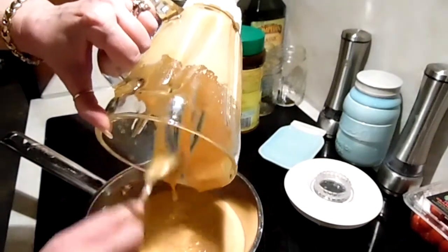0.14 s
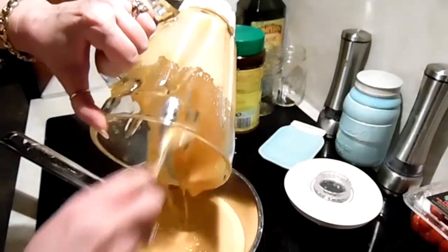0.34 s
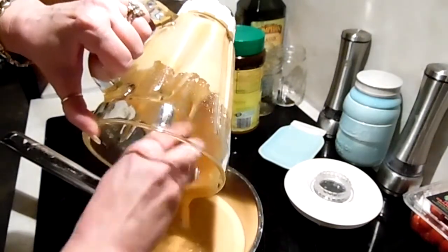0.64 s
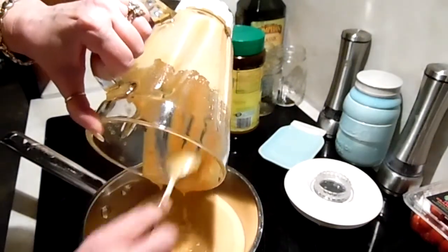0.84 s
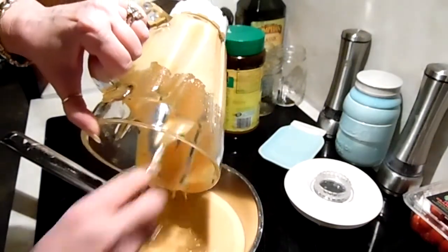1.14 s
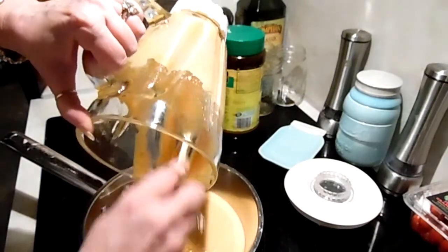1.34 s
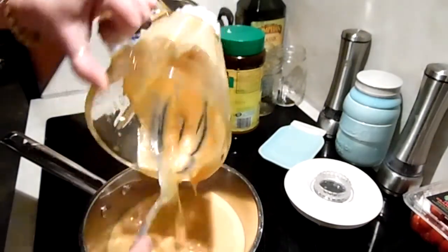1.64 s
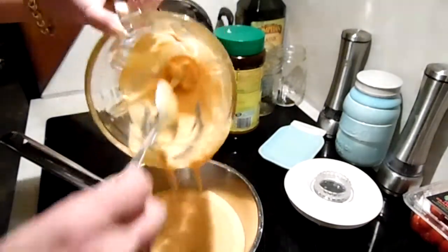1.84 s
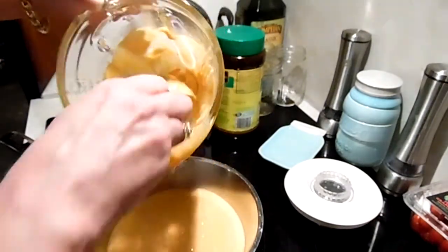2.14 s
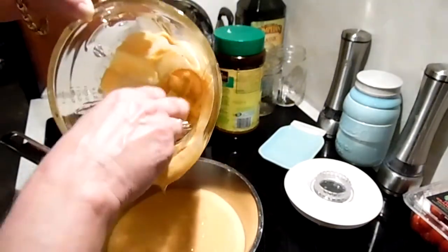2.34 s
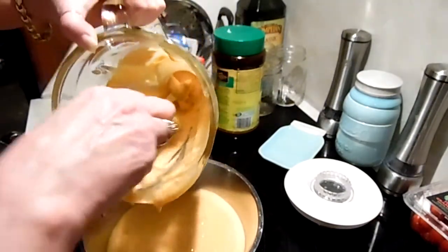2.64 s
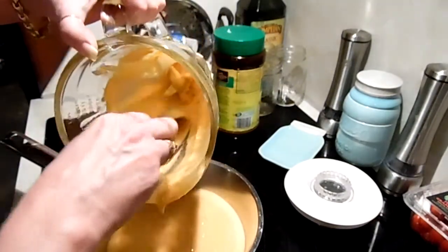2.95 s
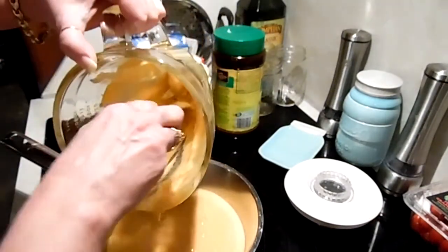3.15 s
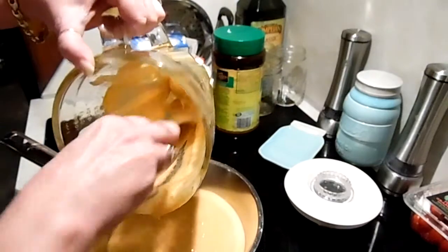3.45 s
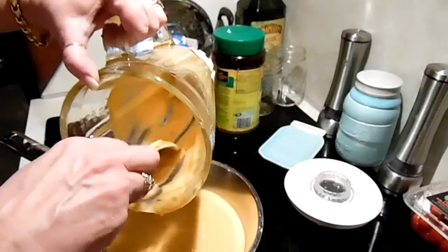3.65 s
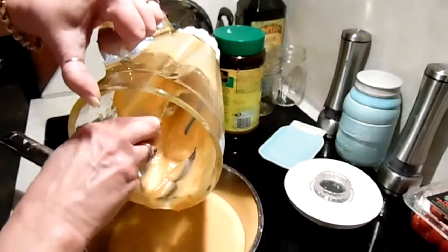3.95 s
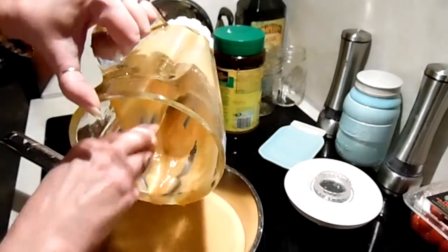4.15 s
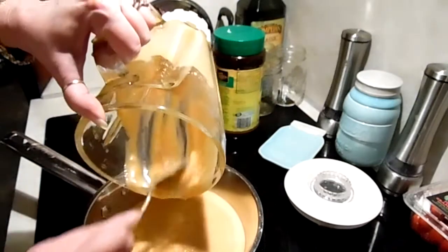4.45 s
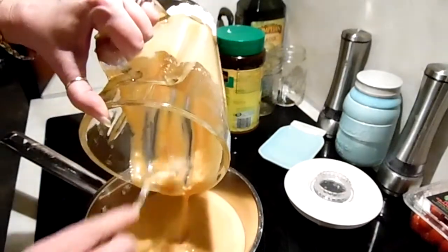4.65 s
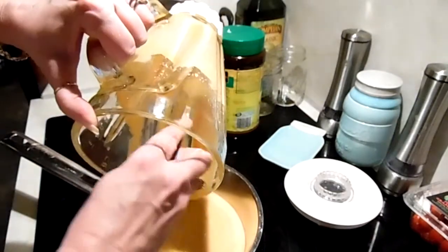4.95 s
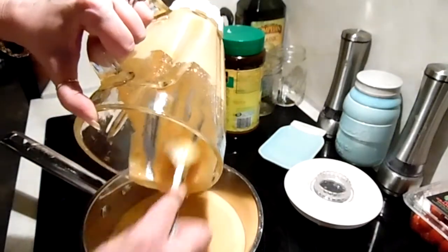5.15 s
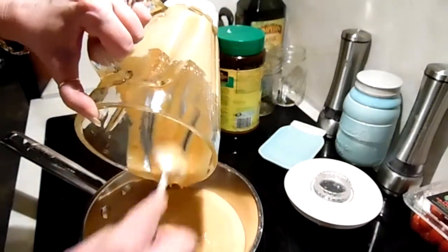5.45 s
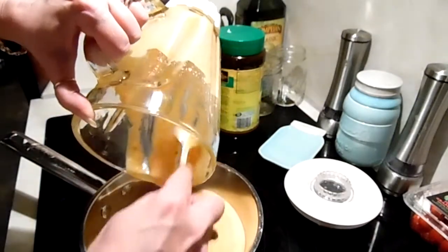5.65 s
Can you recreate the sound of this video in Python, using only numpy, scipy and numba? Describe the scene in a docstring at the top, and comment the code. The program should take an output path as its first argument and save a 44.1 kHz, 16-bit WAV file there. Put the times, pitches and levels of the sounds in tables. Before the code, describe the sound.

A scrape opens, then a spoon knocks a glass jar in uneven sharp clinks, each dying almost at once. A pause near two seconds gives way to quieter taps and a squeaky drag, then harder strikes on the rim. Tiny metallic jewellery rings are barely audible. Close microphone, mono, small kitchen with short reflections and faint hiss.

```python
"""In a quiet kitchen, a metal spoon scrapes thick batter out of a tilted glass jar.
Each tap is a set of short dying tones (jar and spoon ringing) plus a noisy crack, coloured by where it lands.
Between taps, dense random clicks through ringing filters make the spoon drag along the wall.
Tiny high rings make a faint bracelet jingle. An echo of filtered noise surrounds all of these.
Shaped noise adds low room rumble and microphone hiss."""
import sys
import numpy as np
from scipy import signal
from scipy.fft import rfft, irfft
from scipy.io import wavfile
from scipy.ndimage import uniform_filter1d
from numba import njit

SR = 44100
rng = np.random.default_rng(int(sys.argv[2]) if len(sys.argv) > 2 else 0)


def master_out(mix):
    """Clip the mix to full scale and print it as 16-bit PCM to the path in sys.argv[1]."""
    frames = np.transpose(np.atleast_2d(mix))
    ceiling = np.clip(frames, -1, 1)
    pcm = np.round(ceiling * 32767).astype(np.int16)
    wavfile.write(sys.argv[1], SR, pcm)


N = 255780   # length of the scene [samples]

# pitches at which the jar and spoon ring: [Hz]
RING_HZ = [230, 400, 495, 1044, 1127, 1300, 1875, 2089, 2197, 2350, 2678, 3010, 3273, 3390, 3570, 3830,
           4231, 4940, 5070, 5160, 5310, 5770, 6096, 6430, 7000, 7680, 8030, 8220, 8590, 9400, 10750]
# how each of those pitches rings: (level [dB], time to fall by 60 dB [s])
RING_LEVEL_AND_T60 = [(-8.5, 0.037), (1, 0.022), (2.5, 0.045), (-1.5, 0.091), (0, 0.19), (-3, 0.043),
                      (-4.5, 0.055), (-4.5, 0.025), (-10, 0.051), (-11, 0.1), (1.5, 0.095), (-20, 0.039),
                      (-5, 0.098), (-3, 0.051), (-16.5, 0.027), (-2.5, 0.028), (-16.5, 0.047), (8, 0.031),
                      (-11, 0.027), (-7, 0.095), (-9, 0.047), (-15.5, 0.02), (-4, 0.038), (-4, 0.045),
                      (-7, 0.038), (-3.5, 0.04), (-12.5, 0.017), (-5, 0.033), (-4.5, 0.017), (-13.5, 0.026),
                      (-12, 0.035)]
# colour of the noise in cracks and grit: (frequency [Hz], level [dB per Hz])
CRACK_COLOUR = [(500, -50), (1000, -32), (1600, -6.5), (2000, -7.5), (3400, -4.5), (4400, -4.5),
                (5000, 0.5), (6000, -7), (10800, -14.5), (16000, -31.5)]


def from_db(db):
    """Turn decibels into a plain multiplier."""
    return 10 ** (np.asarray(db) / 20)


def rms_one(x):
    """Scale a sound so that its average (RMS) strength is 1."""
    return x / np.sqrt(np.mean(x ** 2) + 1e-20)


def at_hz(points, hz):
    """Read a (frequency [Hz], value) table, with frequency spaced as the ear hears it (log)."""
    table_hz, values = np.transpose(points)
    return np.interp(np.log(hz), np.log(table_hz), values)


def coloured(x, spectrum):
    """Make each frequency of x louder or softer, following (frequency [Hz], level [dB]) points."""
    hz = np.maximum(np.fft.rfftfreq(len(x), 1 / SR), 1)
    return irfft(rfft(x) * from_db(at_hz(spectrum, hz)), len(x))


def band(x, low_hz, high_hz):
    """Keep mainly the frequencies between two limits (Butterworth band-pass)."""
    edges_hz = [low_hz, min(high_hz, .45 * SR)]
    return signal.sosfilt(signal.butter(2, edges_hz, "band", fs=SR, output="sos"), x)


def ring(force, hz, t60):
    """A struck object: each unit click sets off a sine of height 1 that falls by 60 dB in t60 seconds."""
    shrink = from_db(-60 / (t60 * SR))   # per sample
    turn = 2 * np.pi * hz / SR           # radians per sample
    feedback = [1, -2 * shrink * np.cos(turn), shrink * shrink]
    return signal.lfilter([0, np.sin(turn)], feedback, force + 1e-18)


def strike_colour(place, bell_db, middle_db, treble_db):
    """Where the spoon lands decides which pitches it excites: a blend of wall and rim, then extras."""
    # strike colour at the two ends of the jar: (frequency [Hz], on the wall [dB], at the rim [dB])
    wall_and_rim = [(500, -38, -47), (1300, -27.5, -33), (1710, -23.5, -38), (1922, -15, -30),
                    (2200, -12, -29.5), (3468, -15, -26.5), (3262, -13.5, -25.5), (3370, -24.5, -17),
                    (3750, -14.5, -23), (4450, -27.5, -25), (5000, -29, -19.5), (6300, -16.5, -24),
                    (7905, -23.5, -14), (8590, -17, -19.5)]
    # tones set separately for each tap: [Hz]
    bell_hz = [1044, 1128, 2680]
    # the middle range: (from [Hz], to [Hz])
    middle_hz = (3000, 4000)
    treble_from_hz = 5400
    hz, wall_db, rim_db = np.transpose(wall_and_rim)
    db = wall_db + place * (rim_db - wall_db)
    in_middle = (hz > middle_hz[0]) & (hz < middle_hz[1])
    db = db + middle_db * in_middle
    # the treble change grows from nothing to its full amount at the table's last frequency
    treble_share = np.clip(np.log(hz / treble_from_hz) / np.log(hz[-1] / treble_from_hz), 0, 1)
    db = db + treble_db * treble_share
    return sorted([*zip(hz, db), *zip(bell_hz, bell_db)])


def taps(ring_db, crack_db, crack_t60, spread_db, detune):
    """Each tap swells in during contact, sets the jar and spoon ringing and leaves a short noisy crack."""
    # every tap: (time [s], level before ring and crack gains [dB], place [0 deep on the wall, 1 at the rim],
    #             three bell tones [dB each], extra middle [dB], extra treble [dB], contact time [ms])
    tap_list = [(0.171, -23.5, 0.57, -27, -34, -51, 1.5, -15, 1.6),
                (0.212, -27, 0.37, -22, -16.5, -19, 0, -3.5, 0.51),
                (0.5318, -14, 0.69, -54.5, -31, -30.5, 8.5, 5, 0.62),
                (0.596, -6, 0.13, -32, -40.5, -24.5, -1.5, 1.5, 1.4),
                (0.9036, -15, 0.59, -28, -37, -31, -5.5, -7, 0.65),
                (0.9484, -28.5, 0.49, -16, -23.5, -18.5, -2, -8, 0.8),
                (1.2631, -5.5, 1.03, -39.5, -30.5, -28.5, 2, -0.5, 0.67),
                (1.3739, -11.5, 0.63, -37, -41.5, -25.5, -7, 1.5, 1.0),
                (1.498, -5.5, 0.99, -27, -44.5, -20.5, -1.5, 0, 1.12),
                (2.2499, -25.5, 0.36, -34, -16.5, -30, 0.5, 5, 0.67),
                (2.3244, -10.5, 0.069, -53.5, -39, -23.5, 6.5, 0, 0.32),
                (2.3651, -30.5, -0.091, -33, -33, -32, -19.5, 9, 1.0),
                (2.485, -15.5, -0.099, -28, -34.5, -37, -0.5, -3.5, 0.41),
                (2.818, -36, -0.12, -37, -33, -27, 3.5, -16, 0.5),
                (2.8375, -16, 0.29, -39.5, -42, -28.5, 2, 4, 0.61),
                (2.874, -19, 0.23, -58.5, -38, -32, 2, -10.5, 0.48),
                (2.9066, -23, -0.03, -29, -37, -27.5, -1.5, 1, 0.77),
                (3.195, -12, 0.096, -36.5, -40.5, -36, 2, -3.5, 0.23),
                (3.214, -34.5, -0.08, -25, -20, -21, 18, -6, 2.6),
                (3.275, -28.5, -0.18, -54, -50, -20, -1.5, 4, 0.51),
                (3.4301, -28.5, -0.35, -42.5, -36, -26, 2, -9, 2.0),
                (3.969, -25, 0.2, -22, -20.5, -28, 3.5, -0.5, 0.65),
                (4.0158, -10.5, 0.11, -35.5, -32.5, -23.5, 3.5, 1, 0.47),
                (4.403, -49.5, 0.95, -28, -24.5, -18, 12, -1, 2.5),
                (4.4899, -11, 0.77, -29.5, -41, -29, -3.5, -4.5, 0.8),
                (4.542, -17, 0.69, -22.5, -43, -19, 0.5, -4.5, 0.93),
                (4.9099, -4.5, 0.92, -47, -28, -36, 7.5, 1, 0.47),
                (5.0579, -13.5, 0.58, -34.5, -33, -24, 2, 5.5, 0.76),
                (5.0877, -25.5, 0.13, -21.5, -15, -24, 3, -4, 1),
                (5.245, -11.5, 0.77, -32, -47, -29, -2, 1.5, 1.5),
                (5.2781, -17, 0.85, -25.5, -56, -19, 2, -4.5, 3.4),
                (5.585, -9.5, 0.77, -28, -23, -25.5, -2, -2.5, 0.91),
                (5.678, -4.5, 1.02, -27.5, -31, -16.5, -5.5, -0.5, 1.2),
                (5.7914, -4, 1.05, -37.5, -26.5, -23.5, 1, 0.5, 4.3)]
    size = SR // 2
    out = np.zeros(N + size)
    t = np.arange(size) / SR
    hz = np.array(RING_HZ)[:, None]
    mode_db, t60 = np.transpose(RING_LEVEL_AND_T60)[:, :, None]
    decays = from_db(mode_db - 60 * t / t60)
    crack_decay = from_db(crack_db - 60 * t / crack_t60)
    # random level changes, growing with pitch up to 3000 Hz, so that taps differ
    uneven_db = spread_db * np.clip(hz / 3000, 0, 1) ** 2
    for time_s, tap_db, place, *bell_db, middle_db, treble_db, contact_ms in tap_list:
        colour = strike_colour(place, bell_db, middle_db, treble_db)
        random_db = uneven_db * rng.standard_normal(hz.shape)
        strength = from_db(ring_db + at_hz(colour, hz) + random_db)
        # grip and batter shift the pitches a little
        pitch = hz * (1 + detune * rng.standard_normal(hz.shape))
        start_phase = rng.random(hz.shape)
        tones = strength * decays * np.sin(2 * np.pi * (pitch * t + start_phase))
        noise = rms_one(coloured(rng.standard_normal(size), CRACK_COLOUR))
        crack = crack_decay * coloured(noise, colour)
        swell = 1 - np.exp(-t * 1000 / max(contact_ms, .2))
        at = round(time_s * SR)
        out[at:at + size] += from_db(tap_db) * swell * (tones.sum(axis=0) + crack)
    return out[:N]


@njit
def squeak(force, hz, width_hz, rate):
    """A resonance whose centre pitch moves as the contact point slides."""
    out = np.zeros(len(force))
    for i in range(2, len(force)):
        r = np.exp(-np.pi * width_hz[i] / rate)
        push = np.sqrt(1 - r) * (force[i] - force[i - 2])
        swing = 2 * r * np.cos(2 * np.pi * hz[i] / rate) * out[i - 1]
        out[i] = push + swing - r * r * out[i - 2]
    return out


def drags(per_s, damping):
    """The spoon sticks and slips: dense clicks excite ringing tones, a sliding squeak and broad grit."""
    # every drag: (hardest moment [s], pressing in [s], easing off [s], level lost by the end [dB],
    #              three rubbed groups [dB each], squeak [dB], grit [dB],
    #              squeak at start [Hz], squeak at end [Hz], width of each squeak filter [Hz])
    drag_list = [(.1, .15, 0.079, 2.5, -60, -54.5, -58.5, -51, -57.5, 2060, 2610, 381),
                 (0.174, .022, 0.031, 16, -63, -56, -43, -45, -50.5, 2700, 2670, 410),
                 (.68, .04, 0.27, 9.2, -71, -63, -66, -66, -63, 2930, 2080, 500),
                 (1.36, .03, 0.019, 2.3, -71, -73, -74.5, -70, -68, 1300, 1300, 192.8),
                 (2.447, .015, .012, 6.5, -71, -68.5, -60, -49.5, -66, 2200, 2250, 249),
                 (2.468, .008, 0.014, 3.3, -67, -69, -55.5, -63, -58, 2250, 2200, 298),
                 (3.435, .03, .03, 14, -69, -46, -53, -38, -51.5, 2200, 2277, 149.3),
                 (3.49, .03, .14, 7.3, -69.5, -58, -70.5, -63, -72.5, 2300, 2330, 130.6),
                 (3.65, .025, 0.044, 13, -67.5, -76.5, -91.5, -77, -93, 2000, 1464, 201),
                 (4.2, .06, 0.059, 3.9, -73, -72, -78, -78.5, -73, 2200, 2200, 201.5),
                 (4.3, .047, 0.037, 2.1, -74, -62, -61, -73.5, -69, 2200, 2200, 195),
                 (4.4, .027, 0.078, 23, -67, -65, -80, -69, -66, 2400, 2590, 194),
                 (4.769, .06, 0.064, 8, -84, -81, -82, -86.5, -70.5, 2700, 2600, 313),
                 (5.03, .04, 0.045, 3.5, -60, -68, -78, -75, -83, 2216, 2280, 295)]
    # groups of ringing pitches that sing under the spoon: (from [Hz], to [Hz])
    rubbed_groups = [(1000, 1250), (1750, 2000), (3100, 3700)]
    landing_db = -4.5   # level at the start of a drag, compared with its hardest moment
    t = np.arange(N) / SR
    gains = np.zeros((5, N))   # three rubbed groups, squeak, grit
    hz, width_hz = np.full(N, 2000.), np.full(N, 300.)   # squeak settings between drags
    for hardest, press_s, ease_s, lost_db, *voice_db, from_hz, to_hz, width in drag_list:
        start, end = hardest - press_s, hardest + ease_s
        inside = (t >= start) & (t <= end)
        hz[inside] = np.interp(t[inside], [start, end], [from_hz, to_hz])
        width_hz[inside] = width
        pressure_db = np.interp(t[inside], [start, hardest, end], [landing_db, 0, -lost_db])
        gains[:, inside] += from_db(np.add.outer(voice_db, pressure_db))
    slip_size = from_db(2.2 * rng.exponential(1, N))
    slips = (rng.random(N) < per_s / SR) * slip_size * rng.choice([-1, 1], N)
    voices = []
    for low_hz, high_hz in rubbed_groups:
        rubbing = band(slips, 0.85 * low_hz, 1.15 * high_hz)
        # the resting spoon shortens every ring
        voices.append(sum(ring(rubbing, mode_hz, t60 * damping)
                          for mode_hz, (_, t60) in zip(RING_HZ, RING_LEVEL_AND_T60)
                          if low_hz < mode_hz < high_hz))
    squeak_once = squeak(slips, hz, width_hz, float(SR))
    voices.append(squeak(squeak_once, hz, width_hz, float(SR)))
    voices.append(coloured(slips, CRACK_COLOUR))   # grit
    smooth_gains = uniform_filter1d(gains, size=SR // 150)
    return sum(gain * rms_one(voice) for gain, voice in zip(smooth_gains, voices))


def bracelet(level_db, per_s):
    """Each shake sets off a dying cluster of tiny link collisions, ringing high."""
    # every jingle: (time [s], level before level_db and smoothing [dB])
    jingle_list = [(0.391, -52), (1.0513, -50), (1.209, -50.5), (1.7094, -52), (1.8809, -54), (2.0447, -61),
                   (2.073, -51.5), (2.2107, -50), (2.715, -43.5), (3.0679, -44.5), (3.5515, -52.5),
                   (3.5926, -53), (3.6666, -52), (4.15, -50), (4.7292, -55)]
    low_hz, high_hz, cluster_t60_s, link_t60_s = 6240, 13000, 0.077, 0.0064
    shakes = np.zeros(N)
    for time_s, shake_db in jingle_list:
        shakes[round(time_s * SR)] = from_db(shake_db + level_db)
    dying = signal.lfilter([1], [1, -from_db(-60 / (cluster_t60_s * SR))], shakes)
    dying = uniform_filter1d(dying, size=SR // 80)   # the links start moving one after another
    links = (rng.random(N) < per_s / SR) * rng.standard_normal(N)
    pitches = np.geomspace(low_hz, high_hz, 16)
    dealt = rng.integers(0, 16, N)   # which pitch each collision rings
    rings = sum(ring(links * (dealt == k), hz, link_t60_s) for k, hz in enumerate(pitches))
    return dying * rms_one(rings)


def kitchen(x, build_up_s):
    """Diffuse echo: bands of noise, each dying at its own rate, stand for the many reflections."""
    # how long the echo takes to fall by 60 dB: (frequency [Hz], time [s])
    echo_t60 = [(1000, 0.39), (2000, 0.29), (6000, 0.22), (14000, 0.2)]
    t = np.arange(SR // 2) / SR
    edges = 800 * 2. ** np.arange(6)   # octave steps [Hz]
    tail = np.zeros(len(t))
    for low_hz, high_hz in zip(edges, edges[1:]):
        noise = band(rng.standard_normal(len(t)), low_hz, high_hz)
        tail += noise * from_db(-60 * t / at_hz(echo_t60, np.sqrt(low_hz * high_hz)))
    tail = tail * (1 - np.exp(-t / build_up_s))
    return signal.fftconvolve(x, tail / np.sqrt(np.sum(tail ** 2)))[:N]


def rumble():
    """Low room noise in two bands: the upper wanders in level, the deep one swells once."""
    # colour of the noise before it is split: (frequency [Hz], level [dB per Hz])
    rumble_colour = [(3.5, -32.5), (6.0, 3), (42, -0.5), (71, -15.5), (111, -10.5), (151, -23.5),
                     (200, -23), (260, -48.5), (440, -120)]
    # loudness of the upper band: (time [s], level [dB])
    upper_level = [(0.0, -58.5), (1.79, -59.5), (2.1, -61.5), (3.42, -61.5), (4.6, -57.5), (5.0, -60),
                   (5.8, -64)]
    base_db, swell_db, swell_at_s, swell_width_s = -69, 29, 4.73, 0.38   # deep band
    t = np.arange(N) / SR
    noise = coloured(rng.standard_normal(N), rumble_colour)
    deep, upper = band(noise, 6, 18), band(noise, 18, 150)
    deep_db = base_db + swell_db * np.exp(-((t - swell_at_s) / swell_width_s) ** 2)
    upper_db = np.interp(t, *np.transpose(upper_level))
    return from_db(deep_db) * rms_one(deep) + from_db(upper_db) * rms_one(upper)


def microphone_hiss(level_db):
    """Steady random noise from the microphone, shaped to its own colour."""
    # colour of the hiss: (frequency [Hz], level [dB per Hz])
    hiss_colour = [(88, -31.5), (150, -9), (201, -7), (434, -7.5), (814, -13), (1380, -17.5), (4160, -18),
                   (11100, -19), (15200, -23.5), (16500, -35.5)]
    return from_db(level_db) * rms_one(coloured(rng.standard_normal(N), hiss_colour))


def scene():
    """Add the close sounds of jar and bracelet, their echo and the background."""
    close = taps(ring_db=3.0, crack_db=13.0, crack_t60=0.047, spread_db=3.0, detune=0.0025)
    close = close + drags(per_s=9000, damping=.6)
    close = close + bracelet(level_db=-13.0, per_s=4500)
    echo = from_db(-12.5) * kitchen(close, build_up_s=0.0013)
    return (close + echo + microphone_hiss(level_db=-72.5) + rumble())[None]


def record(dry):
    """Cut the top: a steep low-pass holds everything above 16640 Hz at least 100 dB down."""
    return signal.sosfilt(signal.cheby2(20, 100, 16640, fs=SR, output="sos"), dry)


dry = scene()
out = record(dry)
master_out(out)
```